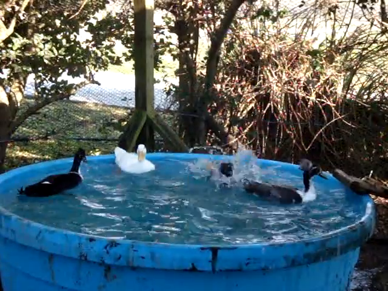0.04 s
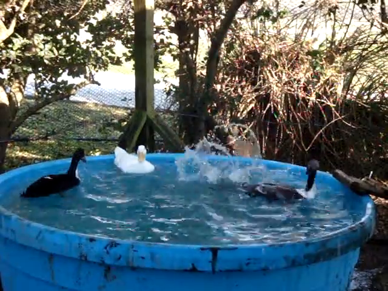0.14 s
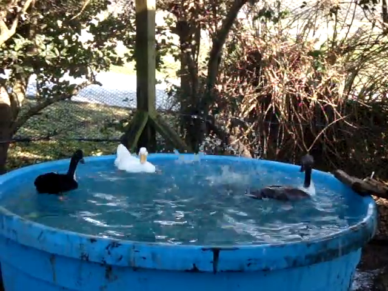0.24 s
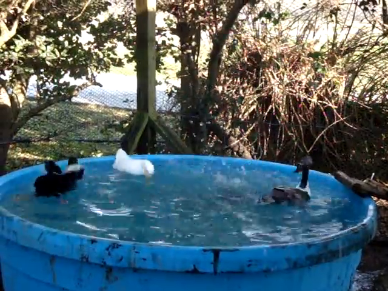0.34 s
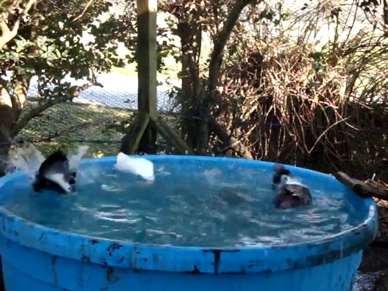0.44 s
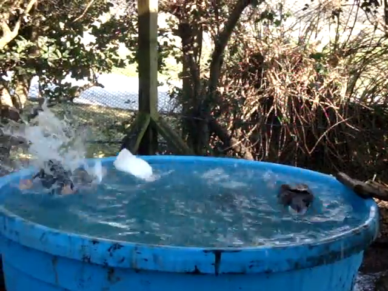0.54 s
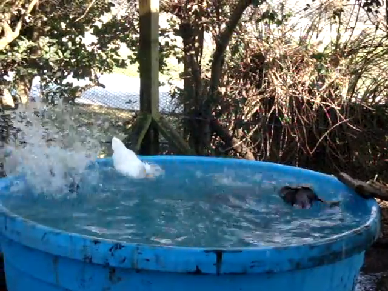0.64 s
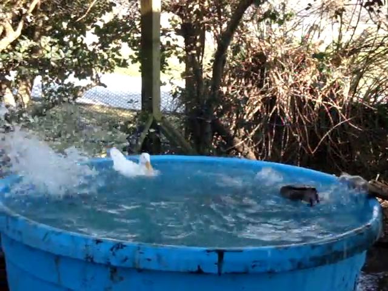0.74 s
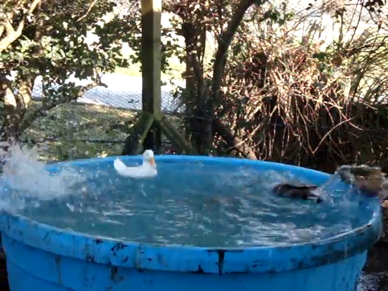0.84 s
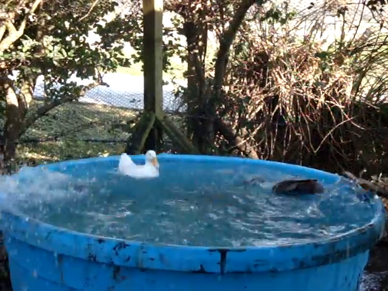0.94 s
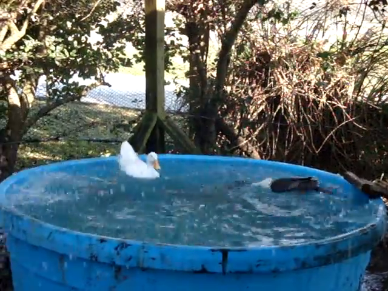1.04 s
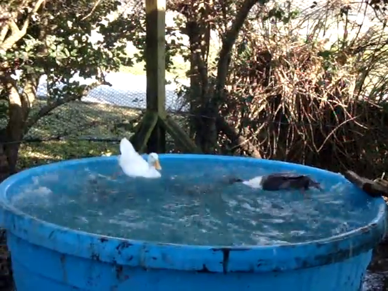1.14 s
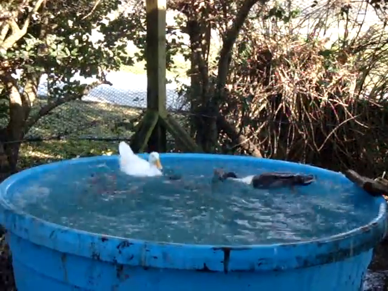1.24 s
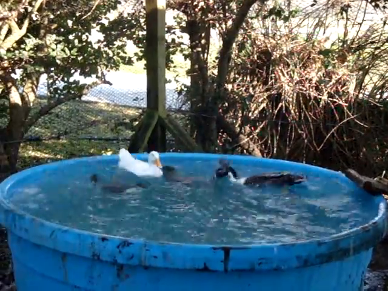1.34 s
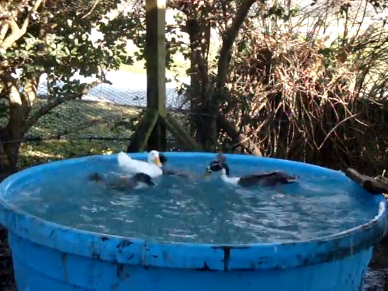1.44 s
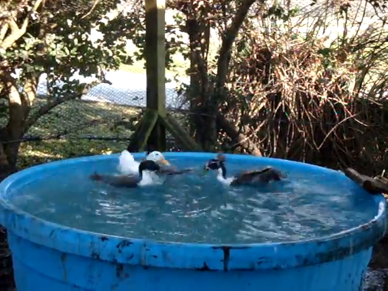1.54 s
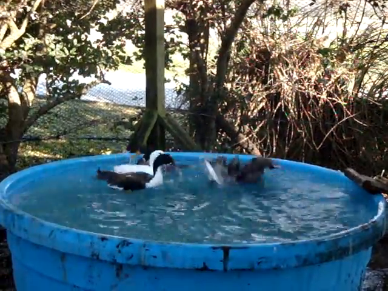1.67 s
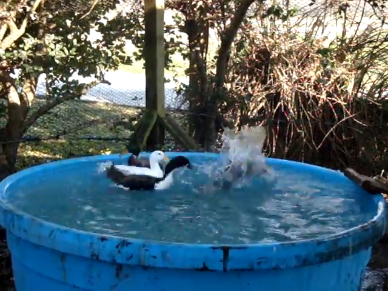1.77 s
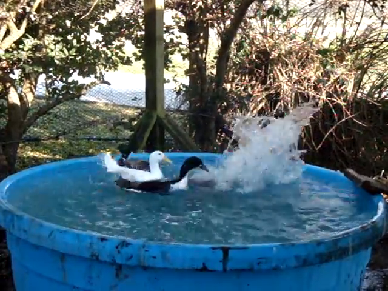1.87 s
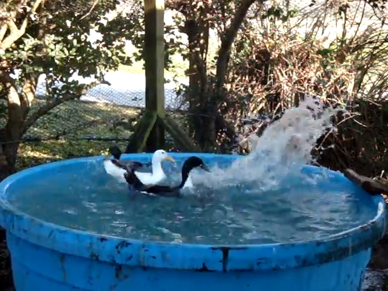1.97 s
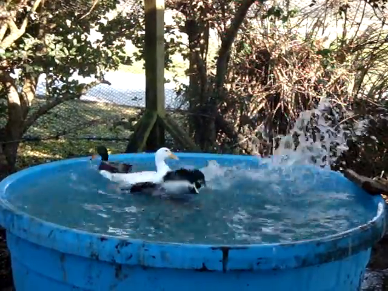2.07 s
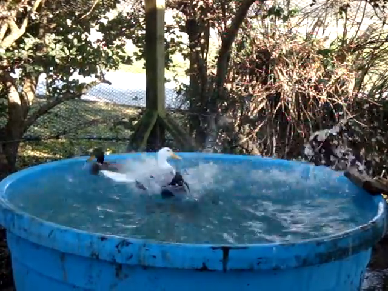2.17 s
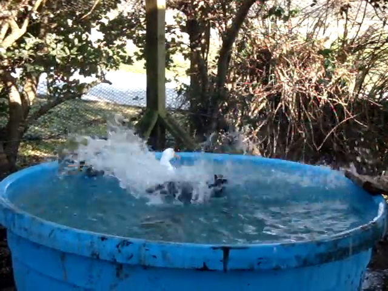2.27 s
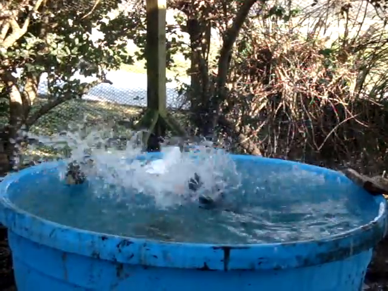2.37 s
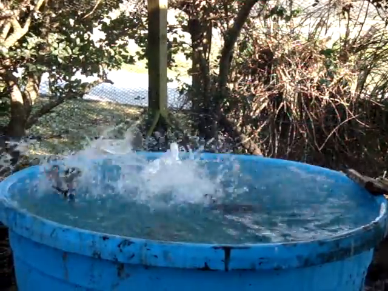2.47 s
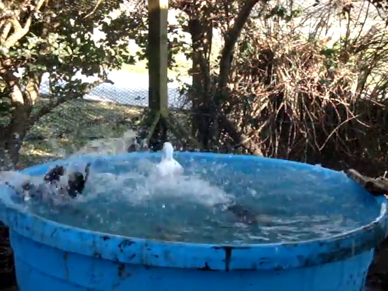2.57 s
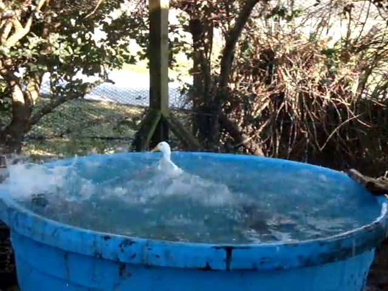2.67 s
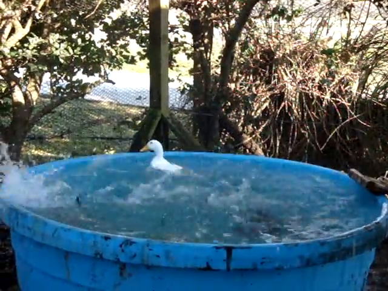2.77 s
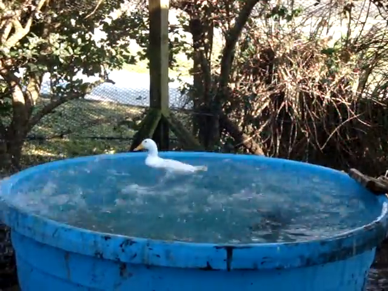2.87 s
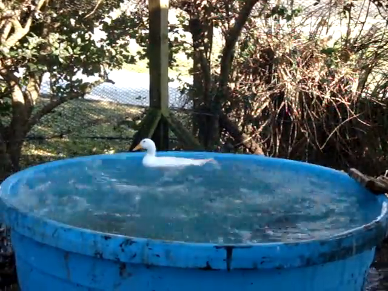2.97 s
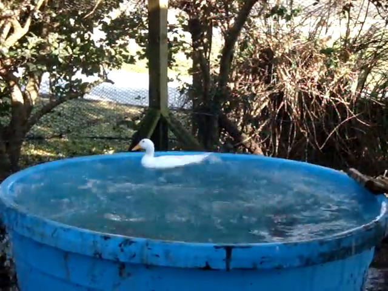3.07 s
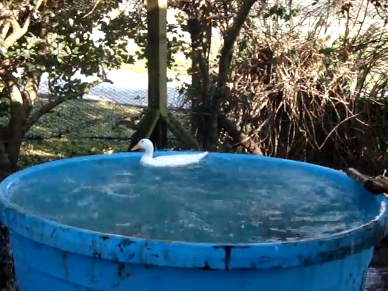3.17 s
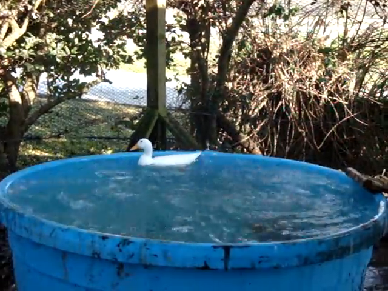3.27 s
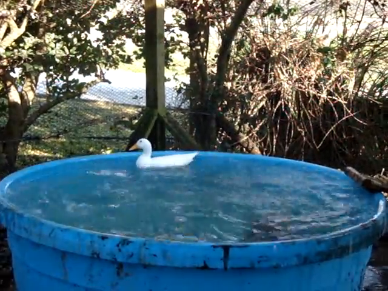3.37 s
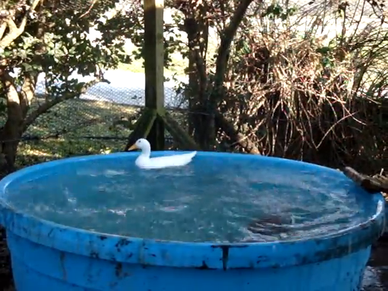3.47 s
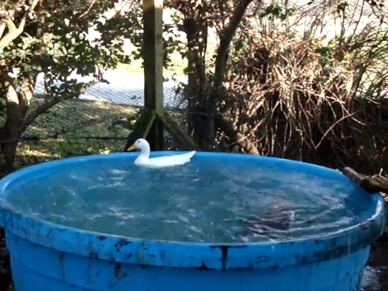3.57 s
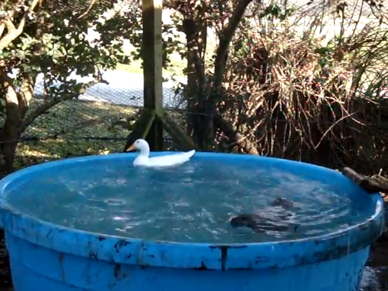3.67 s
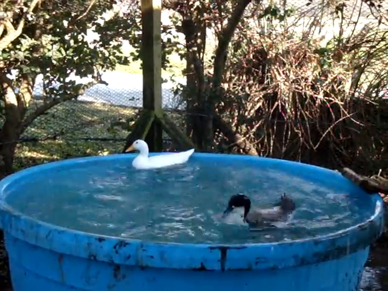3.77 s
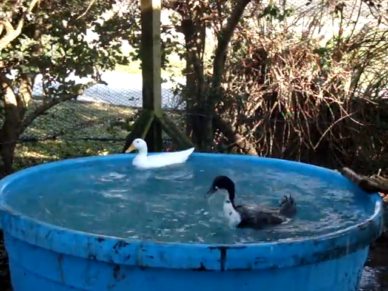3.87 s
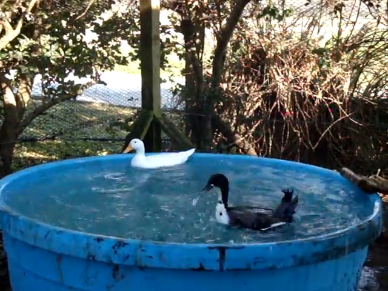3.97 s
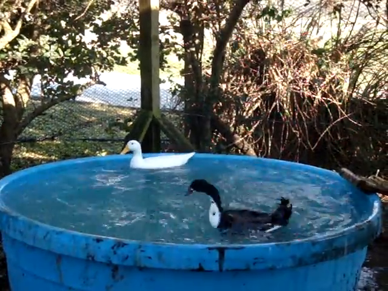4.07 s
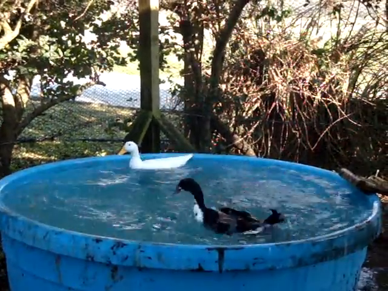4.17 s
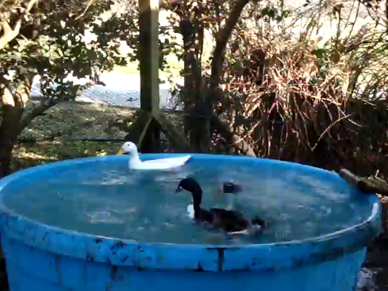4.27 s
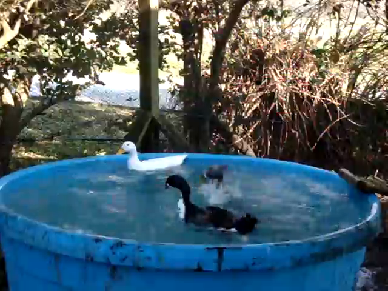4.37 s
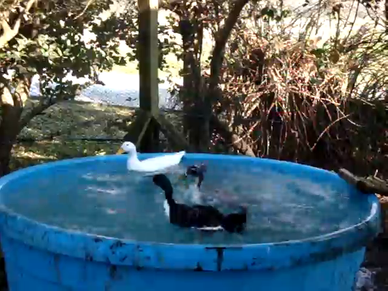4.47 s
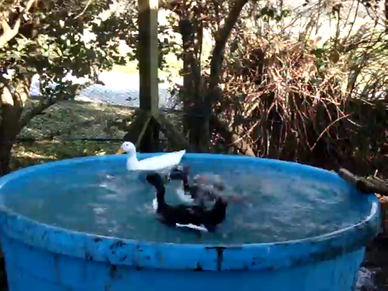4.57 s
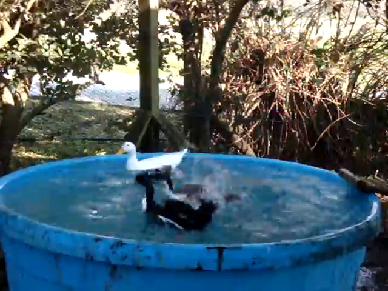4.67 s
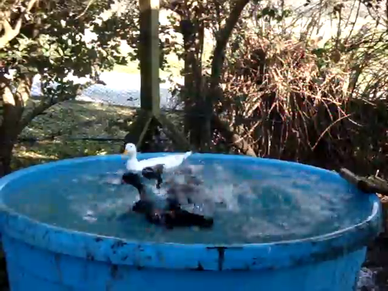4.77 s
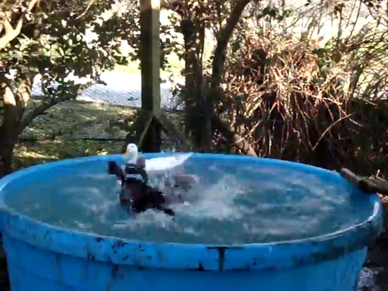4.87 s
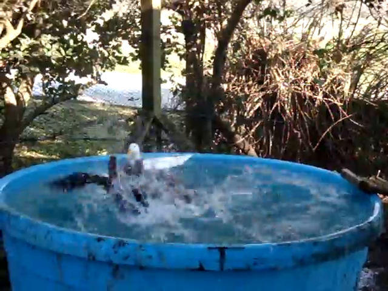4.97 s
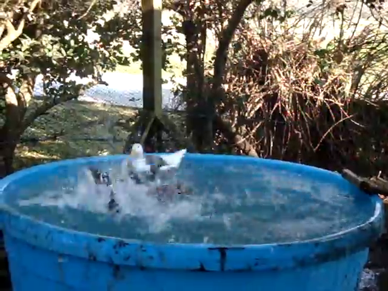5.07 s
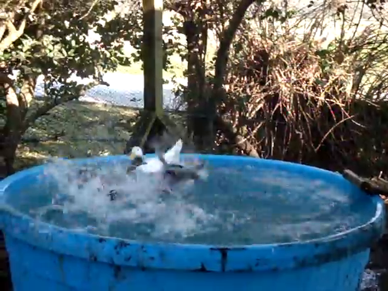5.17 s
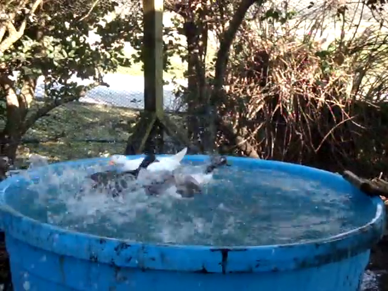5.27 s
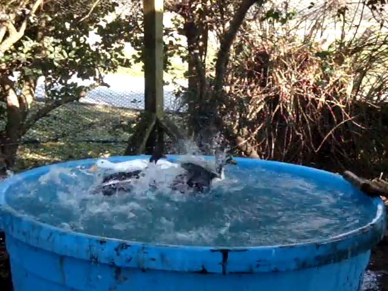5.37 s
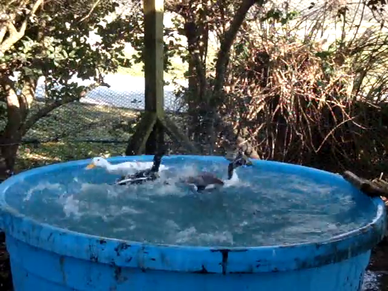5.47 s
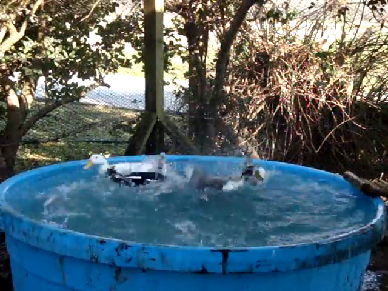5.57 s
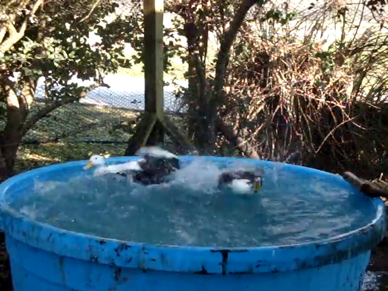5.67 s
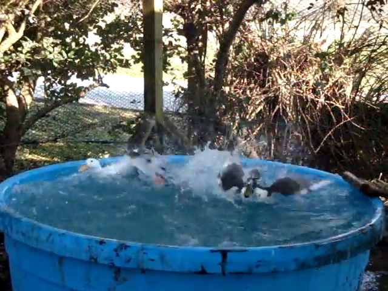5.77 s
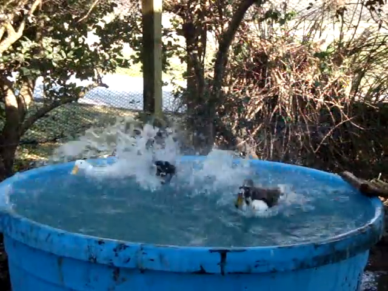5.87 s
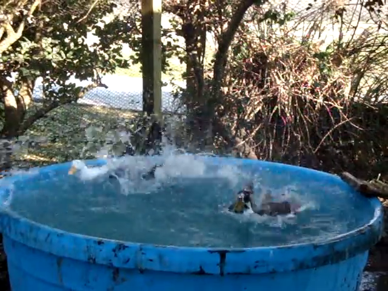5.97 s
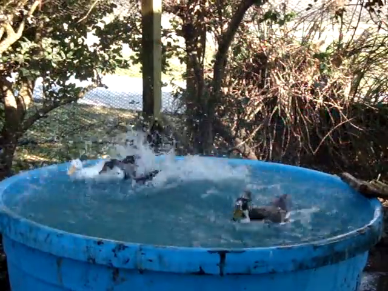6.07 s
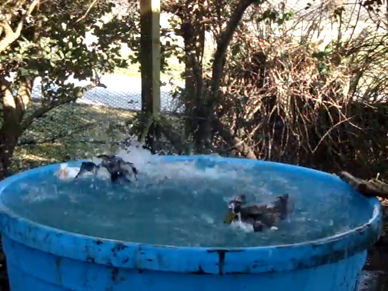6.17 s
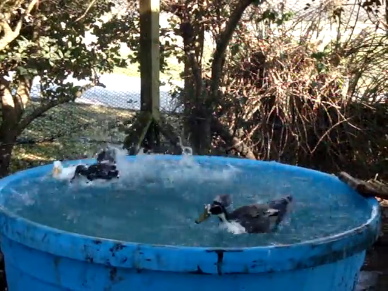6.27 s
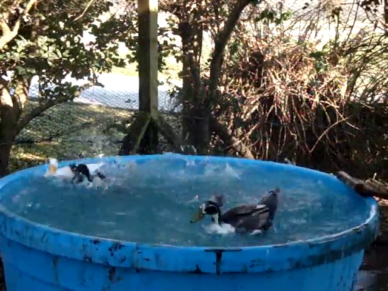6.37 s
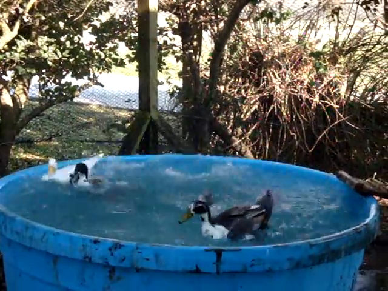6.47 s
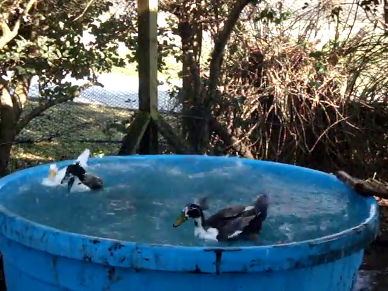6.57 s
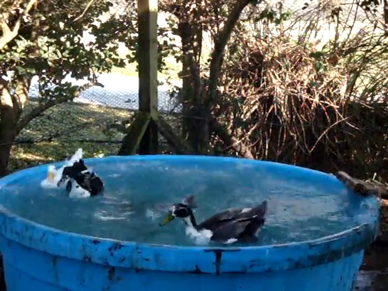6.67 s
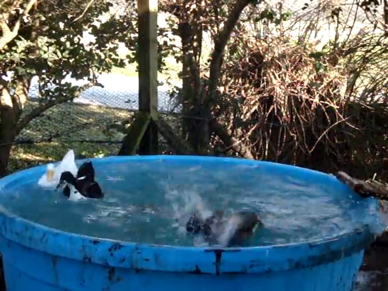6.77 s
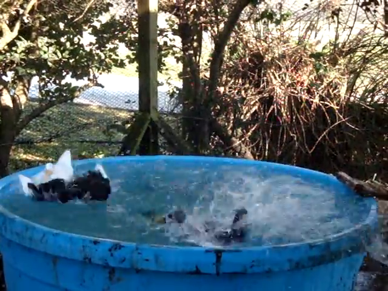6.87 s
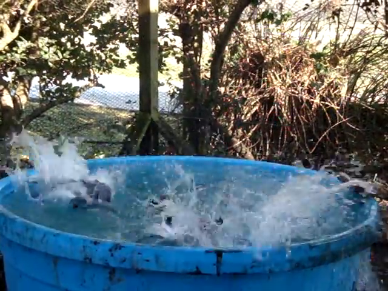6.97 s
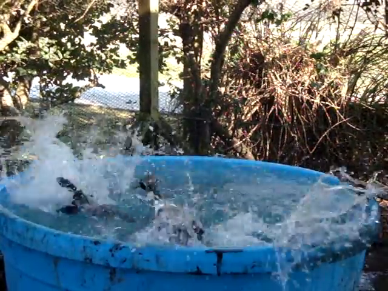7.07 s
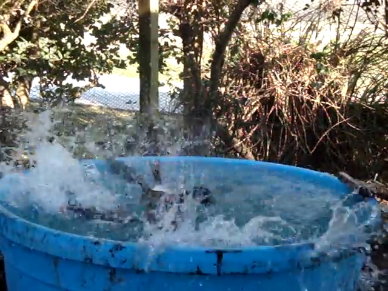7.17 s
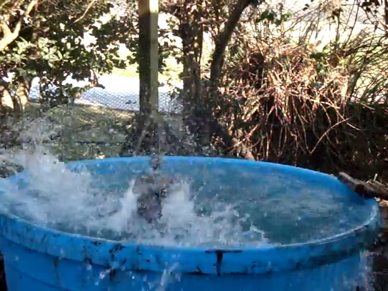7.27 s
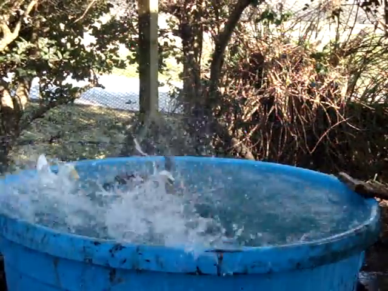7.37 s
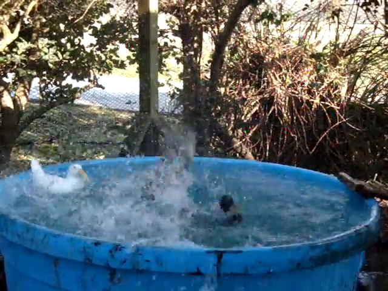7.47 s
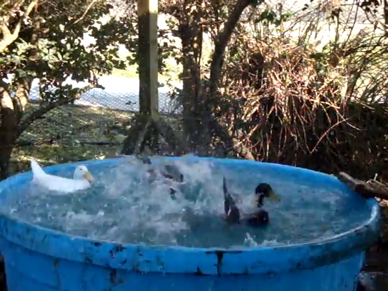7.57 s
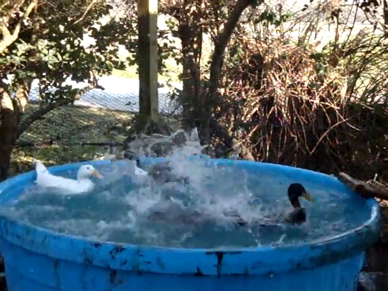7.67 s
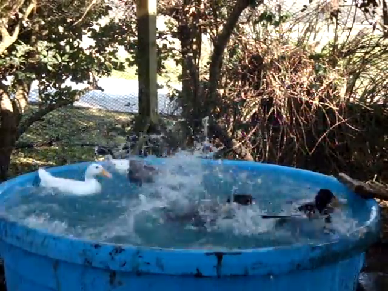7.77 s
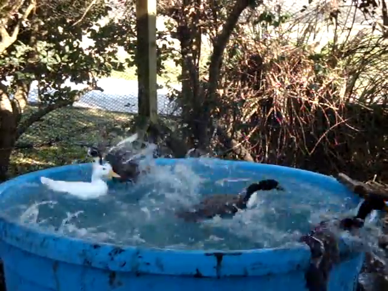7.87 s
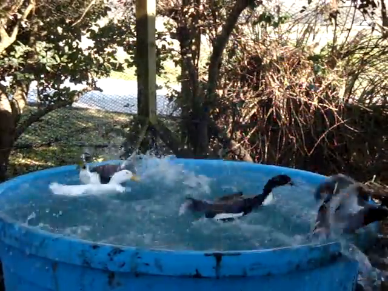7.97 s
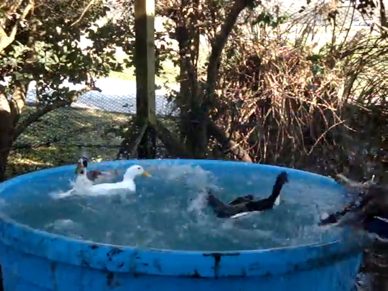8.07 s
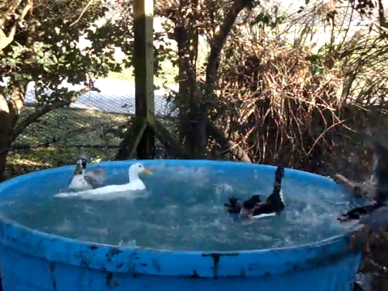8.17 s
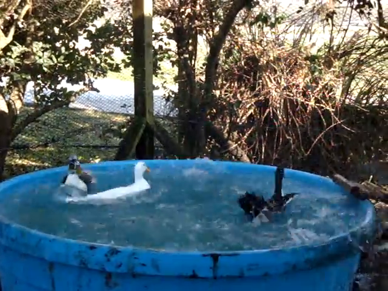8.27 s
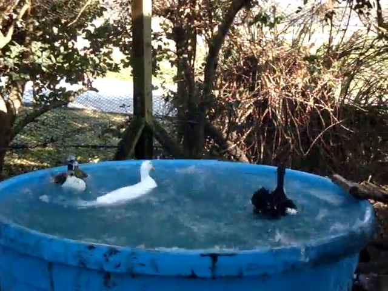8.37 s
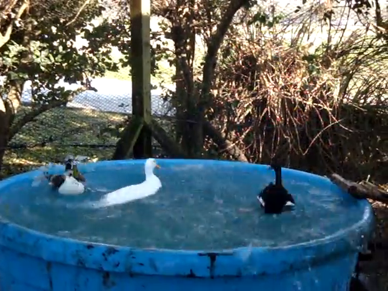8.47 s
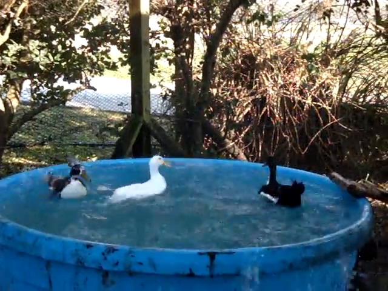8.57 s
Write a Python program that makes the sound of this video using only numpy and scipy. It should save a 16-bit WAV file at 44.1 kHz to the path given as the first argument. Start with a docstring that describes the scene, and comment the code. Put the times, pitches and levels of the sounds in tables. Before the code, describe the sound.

Outdoor splashing at fairly close range: ducks diving and beating the water in a large tub. Bubbly churn, crisp slaps and round plops come in irregular bursts, each followed by falling drops and fizzing spray. Water slops over the rim and spatters on the ground. A quieter dripping stretch sits in the middle, then the busiest thrashing, ending in smaller spatters. Soft distant rush behind, hardly any echo.

```python
"""Splashing bursts, sharp slaps and hollow plops: ducks dive and thrash in a big plastic tub in a garden.
Each thrash swells a swarm of ringing bubbles (churned air); thrown water rains back as drops and fine spray.
Slaps and late ground hits are short noise bursts, plops and gulps large rising rings, spats cracks that ring.
Water over the rim spatters on the wet ground in lumps. Filtered noise gives a low outdoor rumble and rush."""
import sys
import numpy as np
from scipy import signal
from scipy.io import wavfile
from scipy.ndimage import uniform_filter1d

SR = 44100
rng = np.random.default_rng(int(sys.argv[2]) if len(sys.argv) > 2 else 0)


def put_to_file(sound):
    """Save the sound as 16-bit audio at rate SR, in the file named by the first command-line argument."""
    columns = np.atleast_2d(sound).T  # one column per channel
    safe = np.clip(columns, -1, 1)
    whole_steps = np.round(safe * 32767)
    wavfile.write(sys.argv[1], SR, whole_steps.astype(np.int16))


N = 380141
TIME = np.arange(N) / SR

# All levels in the tables are relative: layer gains, filters and the echo come after them.
# A duck dives, paddles or beats its wings.
# Each row: start in seconds, rise in seconds, length in seconds, churned air in dB, thrown water in dB.
THRASHES = [(0.0, 0.0037, 0.11, -32, -38), (0.13, 0.017, 0.21, -35, -39),
            (0.429, 0.008, 0.21, -36.5, -36.5), (0.72, 0.017, 0.22, -30.5, -31.5),
            (1.26, 0.03, 0.41, -41, -46.5), (1.69, 0.046, 0.061, -38.5, -38), (1.81, 0.009, 0.2, -36, -35),
            (1.99, 0.031, 0.26, -36.5, -29), (2.21, 0.02, 0.32, -29, -28.5), (2.57, 0.018, 0.12, -32, -34),
            (3.92, 0.013, 0.06, -44, -42.3), (4.39, 0.028, 0.26, -45.3, -48.5),
            (4.701, 0.063, 0.12, -40.8, -33), (4.81, 0.013, 0.13, -37, -33.5),
            (4.979, 0.012, 0.11, -31, -28), (5.2, 0.019, 0.13, -31.5, -29), (5.41, 0.019, 0.039, -36, -38),
            (5.56, 0.0082, 0.073, -35, -32), (5.744, 0.01, 0.26, -31.5, -29),
            (6.029, 0.04, 0.23, -31, -30.5), (6.518, 0.008, 0.031, -40.5, -33),
            (6.78, 0.025, 0.082, -34.5, -37), (6.925, 0.049, 0.11, -33, -26),
            (7.09, 0.02, 0.18, -29.5, -25.1), (7.28, 0.026, 0.15, -31.5, -33.5),
            (7.63, 0.023, 0.15, -34.5, -30), (7.83, 0.014, 0.051, -33, -30.5),
            (7.991, 0.0069, 0.089, -35, -36)]
# A sheet of water goes over the rim and lands on the ground.
# Each row: start in seconds, length in seconds, spray in dB, drops in dB.
SPILLS = [(0.18, 0.16, -50, -35), (0.494, 0.041, -36, -36), (0.6, 0.05, -41, -32),
          (0.943, 0.04, -33.5, -31), (1.118, 0.081, -30.5, -31), (1.193, 0.11, -28, -27),
          (1.37, 0.071, -42.5, -36), (2.46, 0.07, -32, -29), (2.757, 0.14, -36.4, -33),
          (3.13, 0.12, -34, -32.5), (4.646, 0.061, -45, -40), (5.55, 0.03, -38.5, -34),
          (6.33, 0.05, -37.1, -39), (6.581, 0.24, -42, -38.5), (6.791, 0.15, -40.5, -40),
          (7.38, 0.15, -28.2, -27), (8.158, 0.15, -32, -30), (8.403, 0.029, -37, -32),
          (8.544, 0.056, -38.5, -35.5)]
# The rocking water between splashes. One row: churn in dB, drops in dB, spray in dB.
CALM_DB = (-47.5, -48, -54.5)
# Waves gurgle along the tub wall. Each row: time in seconds, level in dB.
SLOSH_LEVEL = [(0, -33), (.4, -36), (.85, -32), (1.1, -39), (1.7, -42), (2.3, -35), (3.0, -45), (3.6, -52),
               (8.6, -49)]
# Short broad noise bursts: slaps on the water, and in the last two rows water landing on the ground.
# Each row: start in seconds, level in dB, decay in seconds.
IMPACTS = [(0.444, -11.5, 0.005), (0.724, -6, 0.006), (1.814, -12.5, 0.0088), (1.842, -15, 0.0067),
           (2.055, -13, 0.007), (2.207, -7, 0.0088), (5.011, -9, 0.0055), (5.094, -11, 0.0091),
           (5.554, -9, 0.014), (5.763, -8, 0.0081), (6.995, -9.5, 0.0061), (7.123, -5, 0.007),
           (7.208, -11, 0.0049), (7.258, -7, 0.0058), (7.409, -10, 0.0099), (7.526, -5, 0.0086),
           (7.711, -5.5, 0.013), (7.882, -10, 0.0071), (8.239, -11, 0.0035), (8.285, -10, 0.007)]
# Large pockets of air close and ring. Each row: start in seconds, level in dB, starting pitch in Hz.
PLOPS = [(0.039, -13, 1230), (0.07, -10, 1060), (0.723, -7, 1117), (0.798, -15, 988), (0.858, -8.5, 1780),
         (0.989, -16.5, 710), (1.815, -14, 941), (1.912, -12, 1360), (2.289, -6.5, 1750),
         (2.326, -9.5, 1157), (2.416, -14, 835), (2.462, -9.5, 994), (2.495, -10.5, 1084),
         (2.769, -17, 654), (3.107, -19.5, 791), (3.38, -22, 1000), (4.52, -19, 1271), (4.62, -20, 1205),
         (4.83, -18.5, 1118), (5.02, -8, 999), (5.22, -11.5, 1058), (5.804, -9, 1096), (5.903, -11.5, 977),
         (6.815, -15.5, 1020), (6.848, -11, 1010), (6.955, -11.5, 1238), (7.218, -9.5, 919),
         (8.005, -15, 1009), (8.224, -16, 1022), (8.323, -15.5, 1112)]
# Deep gulps as a duck goes under. Each row: start in seconds, level in dB, starting pitch in Hz.
GULPS = [(2.366, -32, 355.9), (5.999, -37, 454.3), (6.037, -33.5, 443.3), (7.162, -22.5, 381)]
# Single blobs land on puddles and the rim. Each row: start in seconds, level in dB, starting pitch in Hz.
SPATS = [(0.318, -18, 2663), (1.0557, -13, 4023), (1.1915, -9.5, 4022), (1.208, -23, 2360),
         (1.2314, -6, 3794), (1.2578, -6, 4900), (1.281, -9, 2773), (1.327, -9, 3302), (1.397, -14, 2594),
         (2.9265, -6, 3740), (3.1695, -12, 3330), (3.2084, -9, 3006), (3.2227, -12, 3745),
         (3.2389, -13, 2604), (3.3313, -8.5, 4670), (3.5483, -17.5, 2230), (3.658, -27, 3590),
         (3.9715, -17, 2510), (3.977, -14, 2098), (4.0069, -14.5, 3822), (4.086, -19.5, 3405),
         (4.153, -23, 2153), (4.2123, -20, 1673), (4.4069, -21, 2884), (4.6653, -25, 1610),
         (4.9116, -15, 3677), (6.6046, -9, 5850), (6.6146, -14, 2595), (6.6623, -6.5, 2089),
         (6.6967, -9.5, 2123), (6.7217, -12, 3665), (6.7443, -9.5, 1852), (6.7509, -8.5, 3500),
         (6.7569, -10, 3634), (6.7684, -12, 3465), (7.6785, -14, 2170), (8.08, -15, 1791),
         (8.1625, -8, 6504)]
# The rumble's slow swell. Each row: time in seconds, level in dB.
RUMBLE_LEVEL = [(0.0, -40), (0.04, -39.5), (0.98, -42), (5.3, -46.5), (6.99, -44), (7.49, -54),
                (8.62, -46.5)]

# Tone of the gurgling waves. Each row: frequency in Hz, relative gain in dB.
GURGLE_COLOUR = [(200, -20.5), (450, 2), (900, -0.5), (1500, 6), (2600, -23)]
# Tone of the churned-in air. Each row: frequency in Hz, relative gain in dB.
CHURN_COLOUR = [(100, -33.5), (250, -2.5), (380, -1), (520, -8), (720, -5), (1000, 1), (1180, 2.5),
                (1400, -5.5), (2000, -1.5), (4000, -41)]
# Tone of the falling drops. Each row: frequency in Hz, relative gain in dB.
DROPS_COLOUR = [(300, -29), (1300, -11), (1850, 1), (2600, 1.5), (3800, 0.5), (5000, -5), (7000, -15.5),
                (10000, -32)]
# Tone of the fine spray. Each row: frequency in Hz, relative gain in dB.
SPRAY_COLOUR = [(1000, -40), (4000, -12.5), (5200, -8.5), (7000, -10.5), (10000, -12.5)]
# Tone of the slaps and ground hits. Each row: frequency in Hz, relative gain in dB.
IMPACT_COLOUR = [(150, -26), (450, -14), (750, -7.5), (1100, 1.5), (1450, -2), (2000, 2.5), (3800, 0.5),
                 (6000, -2.5), (10000, -17.5)]
# Tone of the garden's low rumble. Each row: frequency in Hz, relative gain in dB.
RUMBLE_COLOUR = [(25, -30), (52, -26.5), (68, -8), (80, -14), (120, -5), (200, -0.5), (300, -1),
                 (480, -12.5), (1000, -11), (3000, -56)]
# Tone of the garden's thinner rush. Each row: frequency in Hz, relative gain in dB.
RUSH_COLOUR = [(100, -33.5), (480, -3), (750, 5.5), (1000, 6), (1500, 3.5), (2200, -2.5), (4000, -39.5),
               (10000, -24.5)]

CHURN_RELEASE_S = 0.24
FLIGHT_S, RAIN_ATTACK_S, RAIN_RELEASE_S = 0.37, 0.126, 0.19  # thrown water comes down again
RAIN_DB = -6.5  # falling water against thrown water
TEAR_SPRAY_DB, RAIN_SPRAY_DB = -7, -2.5  # spray on the way up and on the way down
SPILL_ATTACK_S, SPILL_RELEASE_S = 0.016, 0.055
EDGE_HZ = 10250  # top of the recorder's band


def water():
    """Waves gurgle, churned-in air rings low, falling drops higher, and fine spray fizzes on top."""
    churn_db, drops_db, spray_db = agitation()
    slosh_db = follow(SLOSH_LEVEL)
    heaves = gushes(per_s=23, decay=0.0074, depth=0.39)
    showers = gushes(per_s=76, decay=0.0063, depth=0.42)
    slosh = swarm(slosh_db, GURGLE_COLOUR, heaves, 404.6, 1983, per_s=600, cycles=6.5,
                  spread_db=3.0, wash_db=-2.0, tick_db=3.0)
    churn = swarm(churn_db, CHURN_COLOUR, heaves, 603, 1614, per_s=1500, cycles=3.9,
                  spread_db=2.5, wash_db=3.5, tick_db=-1.5)
    drops = swarm(drops_db, DROPS_COLOUR, showers, 1348, 5566, per_s=3000, cycles=8.5,
                  spread_db=2.0, wash_db=2, tick_db=0.5)
    spray = swarm(spray_db, SPRAY_COLOUR, np.sqrt(showers * heaves), 4200, 9750, per_s=5000, cycles=18.3,
                  spread_db=2.5, wash_db=-30.0, tick_db=-31.0)
    return slosh + amp(0.88) * churn + amp(0.8) * drops + spray


def agitation():
    """Levels of churn, drops and spray: thrashes churn and tear the water, which rains back or spills."""
    starts, rises, lengths, air_db, thrown_db = np.transpose(THRASHES)
    churned = surges(starts, rises, lengths, air_db, CHURN_RELEASE_S)
    torn = surges(starts, rises, lengths, thrown_db, CHURN_RELEASE_S)
    rain = surges(starts + FLIGHT_S, RAIN_ATTACK_S, lengths, thrown_db + RAIN_DB, RAIN_RELEASE_S)
    spilt_drops, spilt_spray = spills()
    drops = torn + rain + spilt_drops
    spray = power(TEAR_SPRAY_DB) * torn + power(RAIN_SPRAY_DB) * rain + spilt_spray
    layers = (churned, drops, spray)
    return [level(layer + power(calm_db)) for layer, calm_db in zip(layers, CALM_DB)]


def spills():
    """Power of the drops and spray of spilt water: each sheet breaks up and lands in quick lumps."""
    starts, lengths, spray_db, drops_db = np.transpose(SPILLS)
    lumps = gushes(per_s=150, decay=0.004, depth=0.36) ** 2
    drops = lumps * surges(starts, SPILL_ATTACK_S, lengths, drops_db, SPILL_RELEASE_S)
    spray = lumps * surges(starts, SPILL_ATTACK_S, lengths, spray_db, SPILL_RELEASE_S)
    return drops, spray


def surges(starts, rises, lengths, levels_db, release):
    """Summed power of bursts that rise, hold for their length and die away."""
    total = np.zeros(N)
    for s, rise, length, db in np.broadcast(starts, rises, lengths, levels_db):
        age = np.arange(int((length + 10 * release) * SR)) / SR
        shape = (1 - np.exp(-age / rise)) * np.exp(-np.maximum(age - length, 0) / release)
        add(total, s, power(db) * shape ** 2)
    return total


def gushes(per_s, decay, depth):
    """Water lands in lumps: each lifts the level at once and then dies away."""
    count = int(per_s * N / SR)
    at = rng.integers(0, N, count)
    sizes = rng.exponential(1, count)
    hits = np.bincount(at, sizes, N)
    lumps = signal.lfilter([1], [1, -np.exp(-1 / (decay * SR))], hits)
    return unit(1 + depth * lumps)


def swarm(level_db, spectrum, clumps, lo_hz, hi_hz, per_s, cycles, spread_db, wash_db, tick_db,
          count=160, size=400):
    """Random bubbles and ticks over a noise wash, in clumps, and more thickly when the water is loud."""
    busy = np.sqrt(amp(level_db - level_db.max()))
    due = np.cumsum(per_s * busy) / count / SR  # bubbles expected so far at each pitch
    places, rings = [], []
    for hz in np.linspace(lo_hz, hi_hz, count):
        waits, growth, side = rng.exponential(1, (3, size))
        at = np.searchsorted(due, np.cumsum(waits))
        inside = at < N
        signs = np.sign(side - np.log(2))  # either polarity, equally often
        sizes = amp(spread_db * np.minimum(growth, 4.2)) * signs
        ring = bubble(hz, cycles, rise=0.021)
        places.append((at[inside, None] + np.arange(len(ring))).ravel())
        rings.append(np.outer(sizes[inside], ring / np.linalg.norm(ring)).ravel())
    bubbles = unit(np.bincount(np.concatenate(places), np.concatenate(rings), N)[:N])
    ticks = amp(tick_db) * patter(busy, per_s=2500, spread_db=4.5)
    wash = amp(wash_db) * rng.standard_normal(N)
    x = unit(colour(clumps * (bubbles + ticks + wash), spectrum))
    # even out the level over about 0.1 s, so that the swarm follows its level curve
    local_power = uniform_filter1d(x ** 2, size=4400)
    return amp(level_db) * x / np.sqrt(abs(local_power) + 0.0065)


def bubble(hz, cycles, rise):
    """A damped ring that climbs in pitch, by the fraction rise per decay time, as it nears the surface."""
    life = cycles / hz  # decay time in seconds
    age = np.arange(int(5 * life * SR)) / SR / life  # in decay times
    turns = hz * life * (age + rise * age ** 2 / 2)
    onset = 1 - np.exp(-2 * turns)
    return np.sin(2 * np.pi * turns) * np.exp(-age) * onset


def patter(busy, per_s, spread_db):
    """Drops that only tick on the surface, with no ring."""
    sizes = amp(spread_db * np.minimum(rng.exponential(1, N), 4.5)) * rng.choice([-1, 1], N)
    lands = rng.random(N) < per_s * busy / SR
    return unit(sizes * lands / np.sqrt(busy))


def impacts():
    """A slap on the water, or water landing on the ground, gives a short broad burst of crackle."""
    out, t = np.zeros(N), np.arange(SR // 10) / SR
    for s, db, decay in IMPACTS:
        envelope = (1 - np.exp(-t / 0.0029)) * np.exp(-t / decay)
        burst = colour(rng.standard_normal(len(t)) * envelope, IMPACT_COLOUR)
        loudness = burst[:SR // 100].std()  # over the first 10 ms
        add(out, s, amp(db - 15.0) * burst / loudness)
    return out


def plops(rows, gain_db, cycles, rise, pop_db):
    """A pocket of air shuts with a brief pop and rings on as a large bubble."""
    out, t = np.zeros(N), np.arange(SR // 30) / SR
    for s, db, hz in rows:
        band = [(hz / 3, -25), (hz * 0.55, 0), (hz * 1.68, 0), (hz * 3, -22)]
        pop = colour(rng.standard_normal(len(t)) * np.exp(-t / 0.0097), band, size=1024)
        add(out, s + 0.00097, amp(db + pop_db) * pop / abs(pop).max())
        add(out, s + 0.001356, amp(db + gain_db) * bubble(hz, cycles, rise))
    return out


def spats():
    """A blob lands with a sharp crack and traps a small, quickly dying bubble."""
    out, t = np.zeros(N), np.arange(SR // 30) / SR
    for s, db, hz in SPATS:
        crack_hz = 3400 * (hz / 3400) ** 0.36  # smaller blobs crack a little higher
        band = [(crack_hz / 4, -28), (crack_hz * 0.71, -5), (crack_hz * 1.32, 0), (crack_hz * 2.75, -20)]
        envelope = np.exp(-t / 0.0033) + 0.33 * np.exp(-t / 0.0025)
        crack = colour(rng.standard_normal(len(t)) * envelope, band, size=512)
        add(out, s + 0.000993, amp(db - 4.5) * crack / abs(crack).max())
        add(out, s + 0.00098, amp(db - 5.0) * bubble(hz, cycles=6.9, rise=0.021))
    return out


def surroundings(x, t60, wet_db, count=5):
    """Tub wall, fence and bushes scatter a brief echo; its sparse random patterns cross-fade steadily."""
    t, echo = np.arange(SR // 4) / SR, np.zeros(N)
    for place in range(count):
        hits = rng.random(len(t)) < 2000 / SR  # 2000 reflections a second
        taps = rng.standard_normal(len(t)) * hits * (t > .003) * amp(-60 * t / t60)
        share = np.cos(np.pi * (2 * TIME + place / count)) * np.sqrt(2 / count)
        echo += signal.oaconvolve(x * share, taps / np.linalg.norm(taps))[:N]
    return x + amp(wet_db) * echo


def garden():
    """Low noise rumble with a slow swell, and a steady thinner rush, as of a far road."""
    rumble = colour(rng.standard_normal(N), RUMBLE_COLOUR, size=16384)
    rush = colour(rng.standard_normal(N), RUSH_COLOUR)
    return amp(follow(RUMBLE_LEVEL) + 1.05) * unit(rumble) + amp(-43.0) * unit(rush)


def amp(db):
    """Decibels to gain."""
    return 10 ** (np.asarray(db) / 20)


def power(db):
    """Decibels to power."""
    return amp(db) ** 2


def level(energy):
    """Power to decibels."""
    return 10 * np.log10(energy)


def unit(x):
    """Scales to rms 1."""
    return x / np.sqrt(np.mean(x ** 2) + 1e-20)


def follow(rows):
    """A level curve read out at every sample, with straight lines between its points."""
    s, db = np.transpose(rows)
    return np.interp(TIME, s, db)


def add(mix, s, sound):
    """Mixes a sound in at time s, cut off at the end of the mix."""
    part = mix[round(s * SR):][:len(sound)]
    part += sound[:len(part)]


def colour(x, points, size=2048):
    """A causal minimum-phase filter with the given spectrum, so that clicks stay sharp."""
    hz, db = np.transpose(points)
    bins_hz = abs(np.fft.fftfreq(size, 1 / SR)) + 1
    log_gain = np.log(amp(np.interp(np.log(bins_hz), np.log(hz), db)))
    response = np.exp(np.conj(signal.hilbert(log_gain)))
    taps = np.fft.ifft(response).real[:size // 2]
    return signal.oaconvolve(x, taps)[:len(x)]


def scene():
    """All the water sounds with their echo, in the open garden."""
    pockets = plops(PLOPS, gain_db=-3.5, cycles=5.5, rise=0.02, pop_db=-9.5)
    gulps = plops(GULPS, gain_db=6.0, cycles=4.4, rise=0.056, pop_db=1)
    wet = water() + impacts() + spats() + pockets + gulps
    return (surroundings(wet, t60=0.038, wet_db=-18.5) + garden())[None]


def record(dry):
    """The recorder's band limit: a steep low-pass."""
    low_pass = signal.firwin(601, EDGE_HZ, window=("kaiser", 8), fs=SR)
    return signal.oaconvolve(dry, low_pass[None], "same")


dry = scene()
out = record(dry)
put_to_file(out)
```